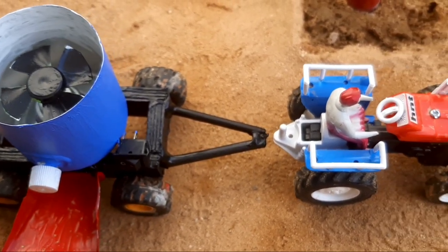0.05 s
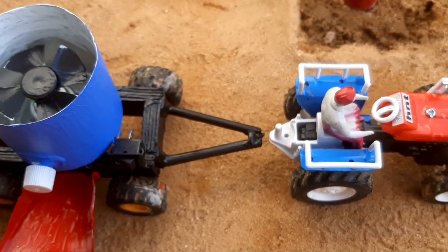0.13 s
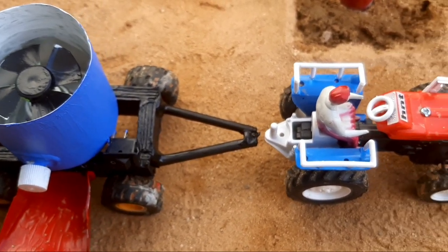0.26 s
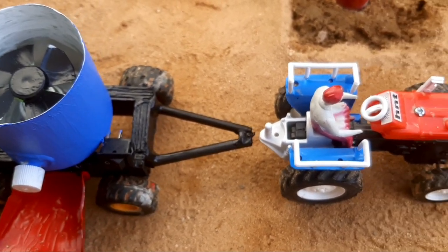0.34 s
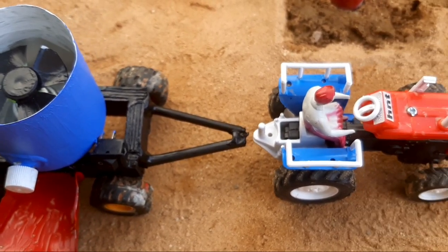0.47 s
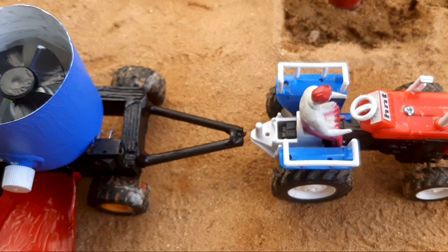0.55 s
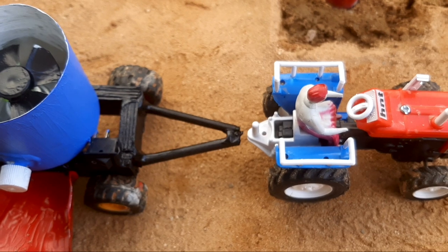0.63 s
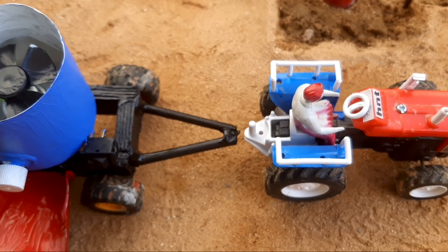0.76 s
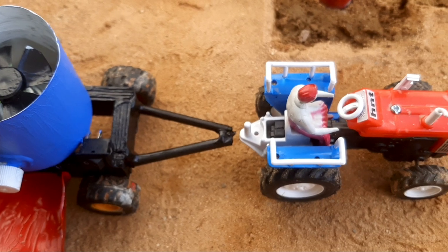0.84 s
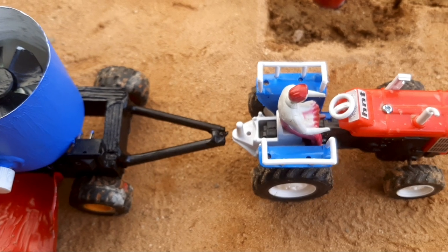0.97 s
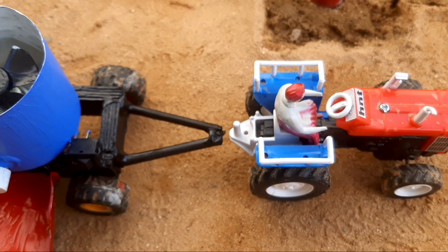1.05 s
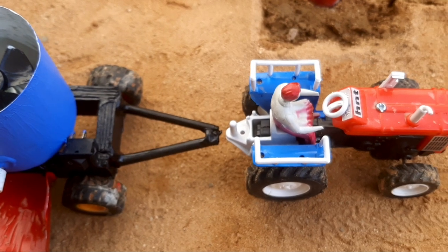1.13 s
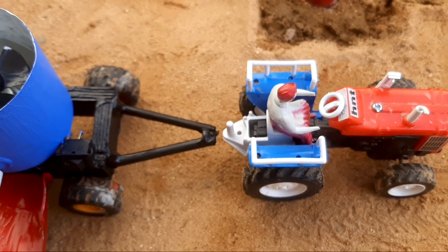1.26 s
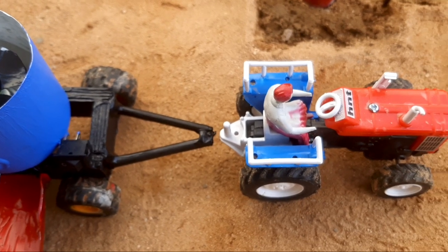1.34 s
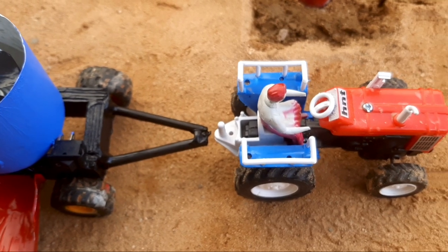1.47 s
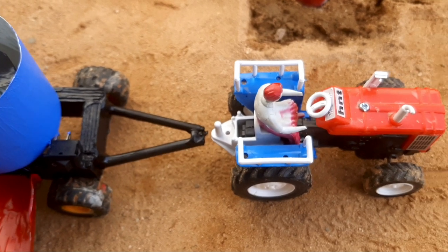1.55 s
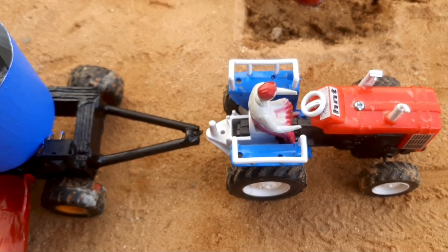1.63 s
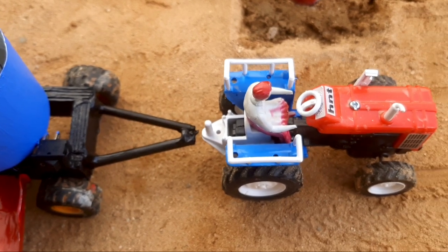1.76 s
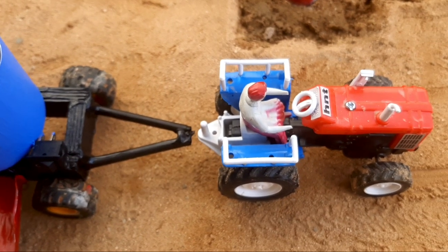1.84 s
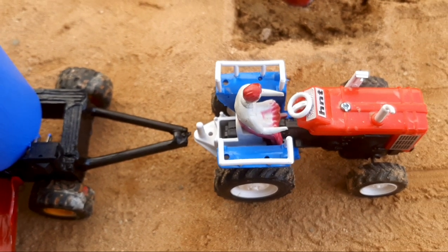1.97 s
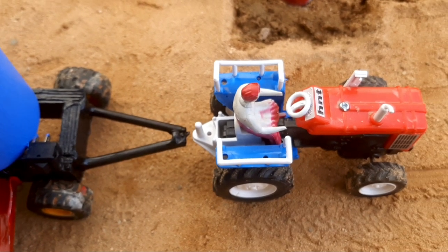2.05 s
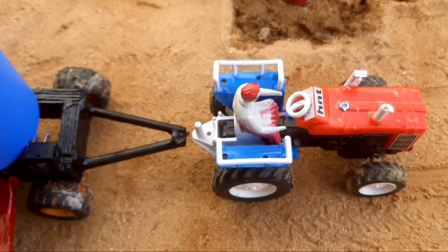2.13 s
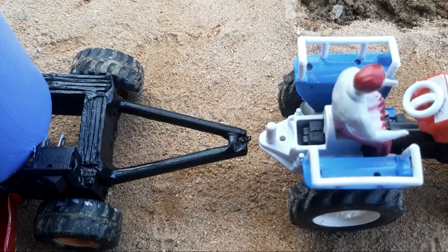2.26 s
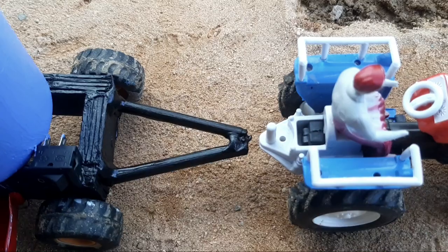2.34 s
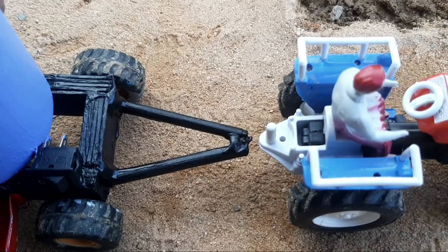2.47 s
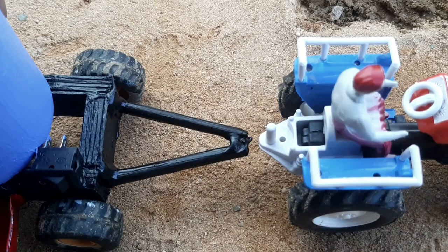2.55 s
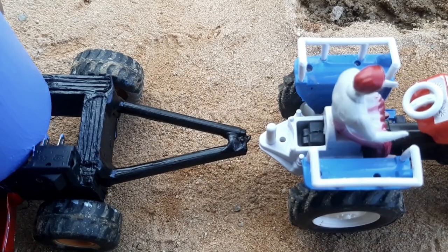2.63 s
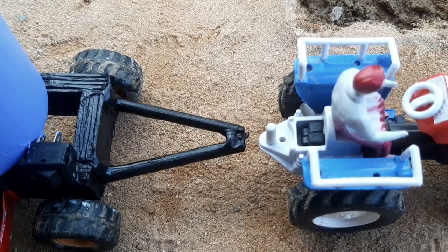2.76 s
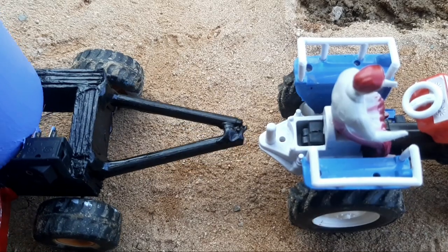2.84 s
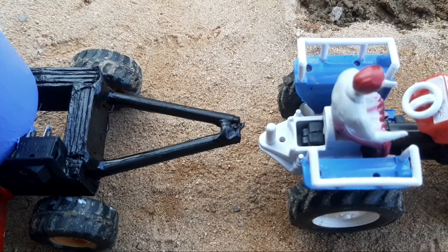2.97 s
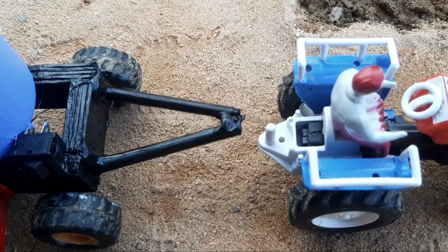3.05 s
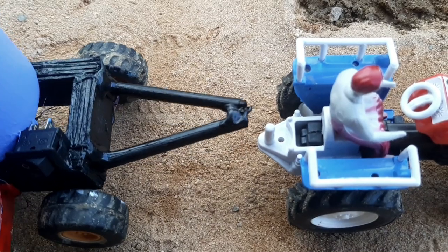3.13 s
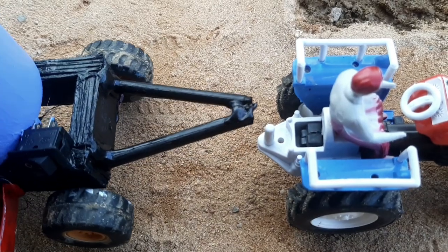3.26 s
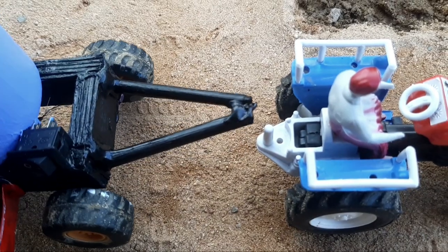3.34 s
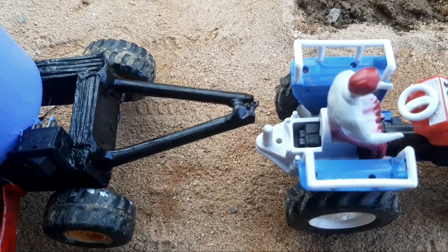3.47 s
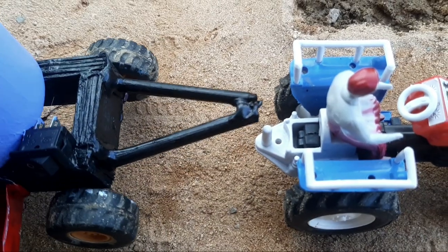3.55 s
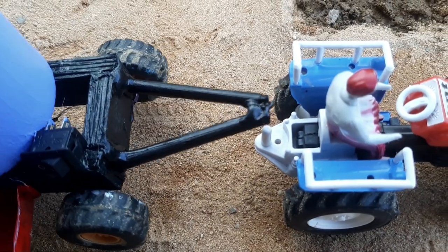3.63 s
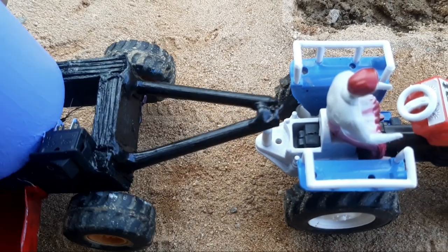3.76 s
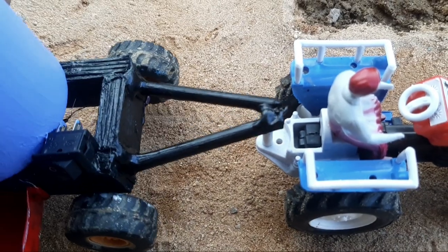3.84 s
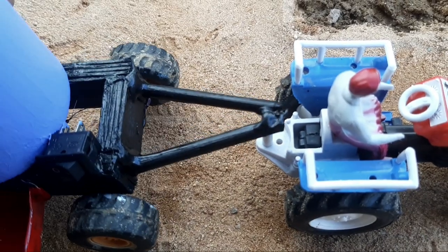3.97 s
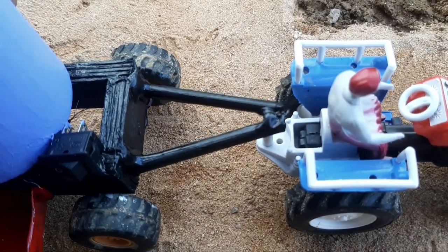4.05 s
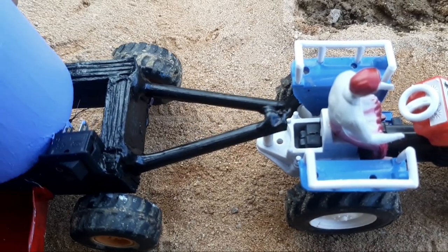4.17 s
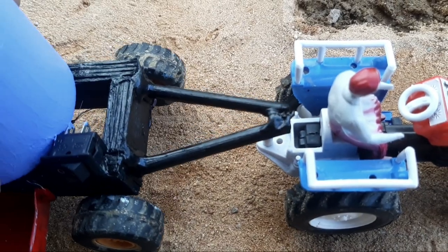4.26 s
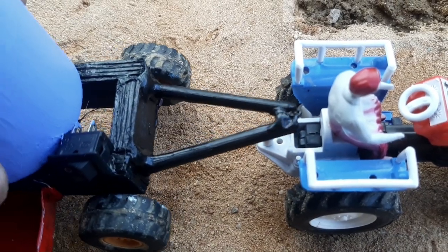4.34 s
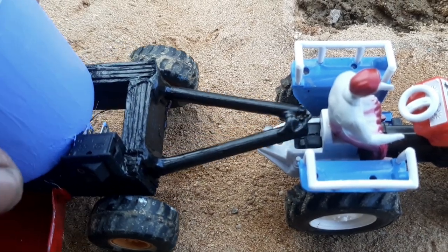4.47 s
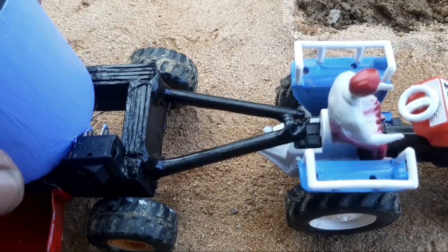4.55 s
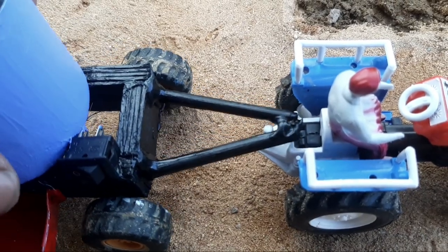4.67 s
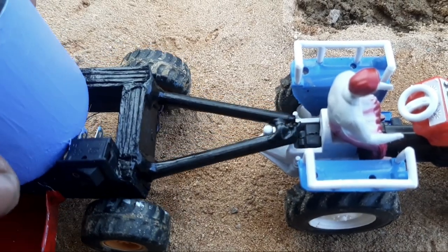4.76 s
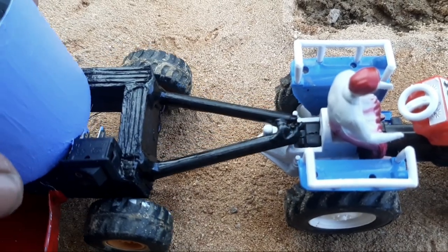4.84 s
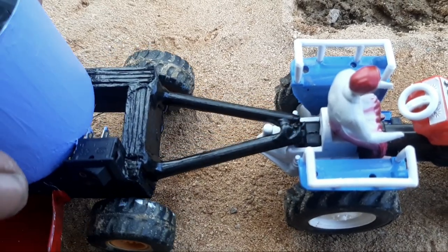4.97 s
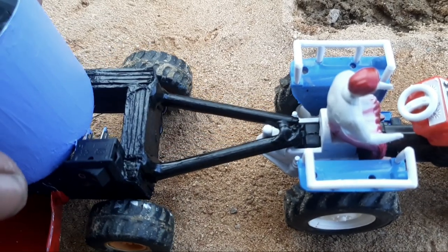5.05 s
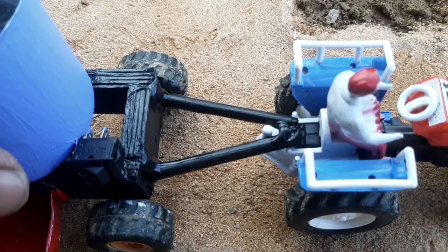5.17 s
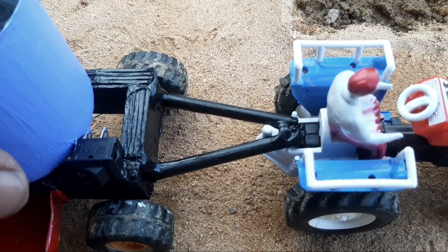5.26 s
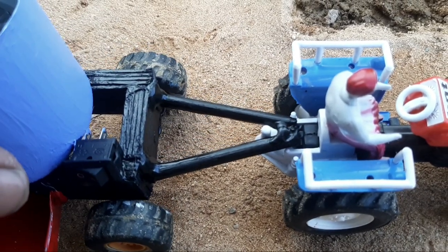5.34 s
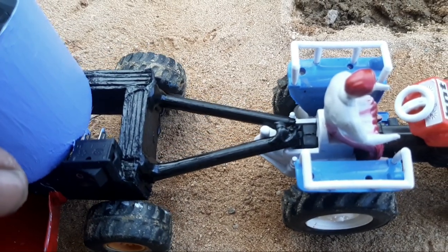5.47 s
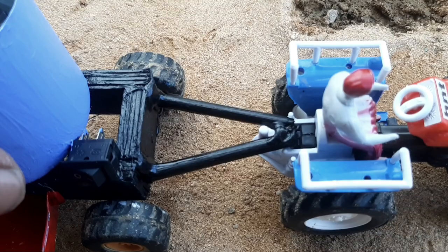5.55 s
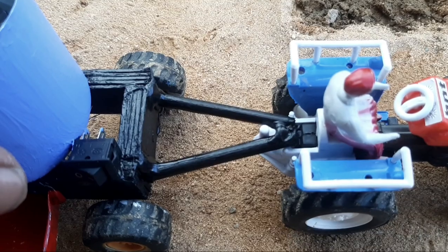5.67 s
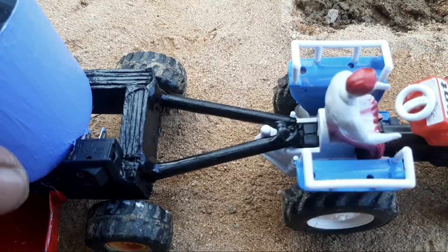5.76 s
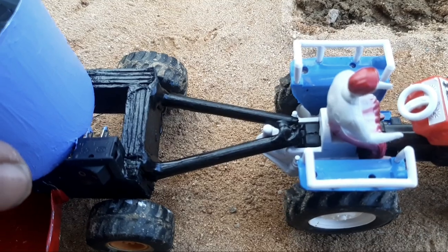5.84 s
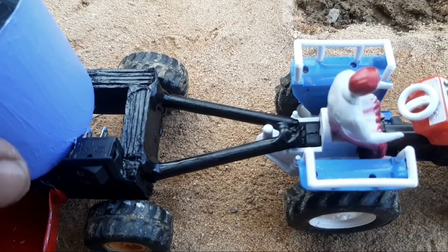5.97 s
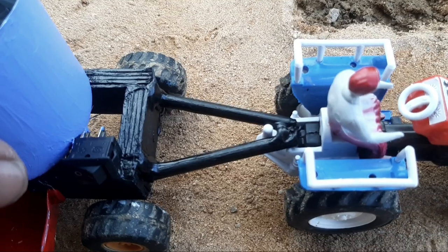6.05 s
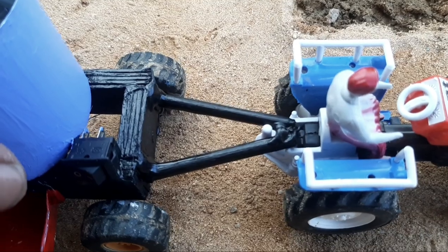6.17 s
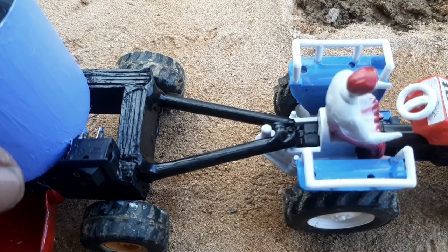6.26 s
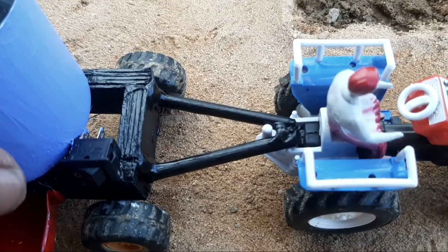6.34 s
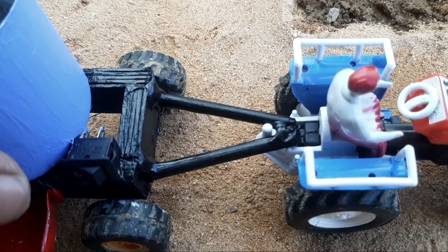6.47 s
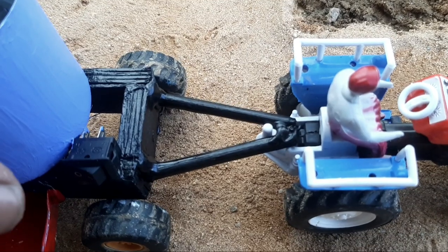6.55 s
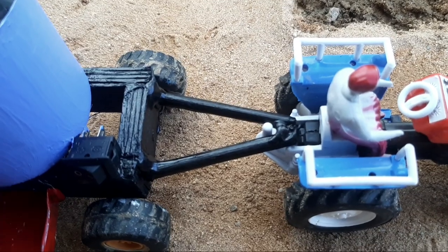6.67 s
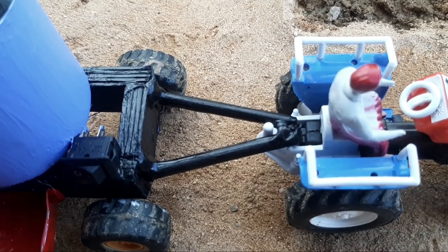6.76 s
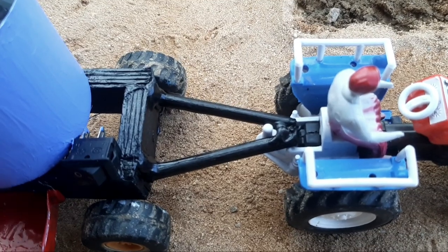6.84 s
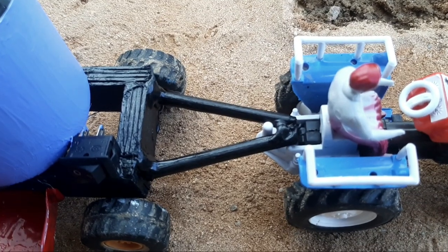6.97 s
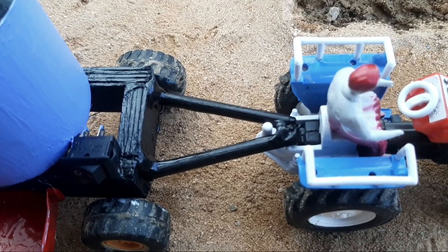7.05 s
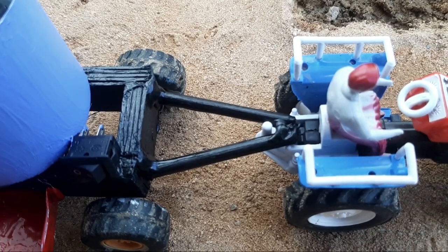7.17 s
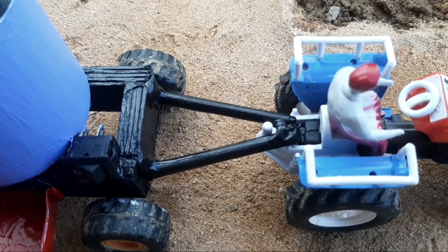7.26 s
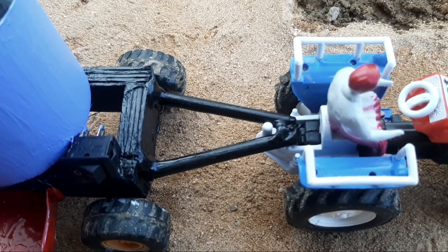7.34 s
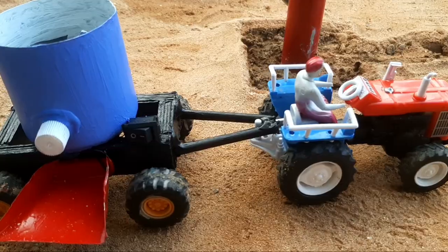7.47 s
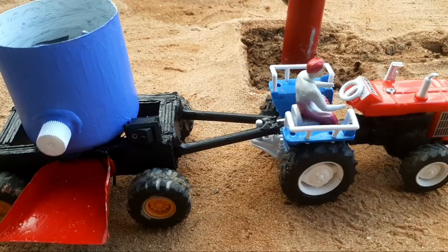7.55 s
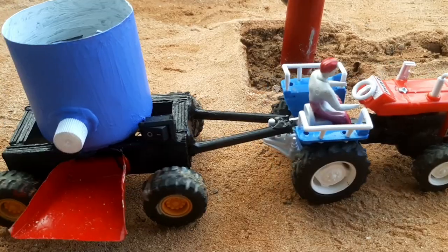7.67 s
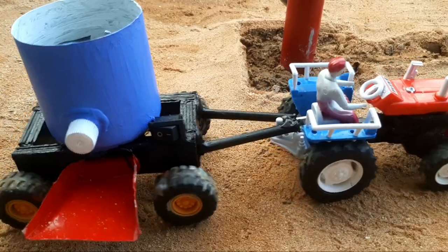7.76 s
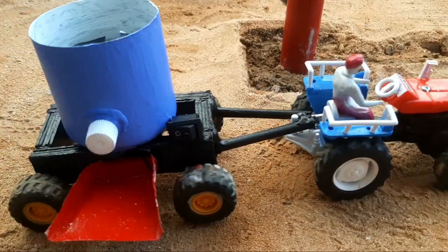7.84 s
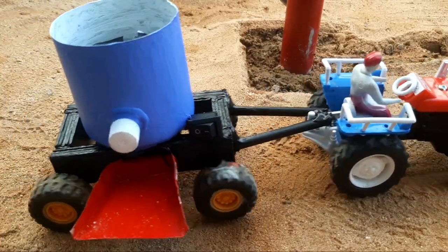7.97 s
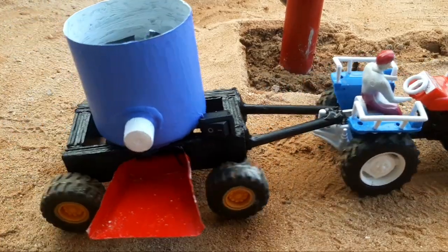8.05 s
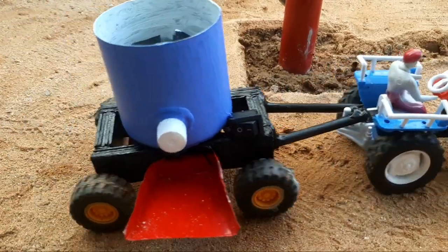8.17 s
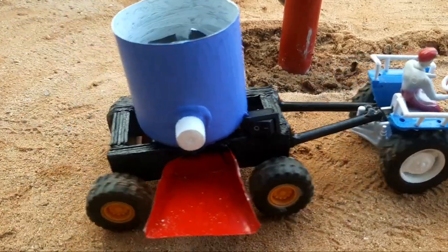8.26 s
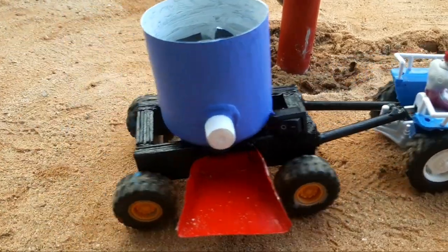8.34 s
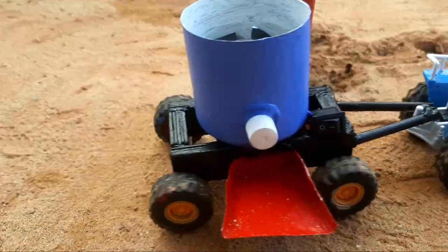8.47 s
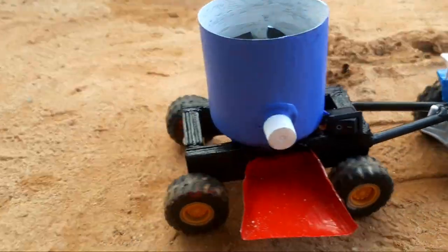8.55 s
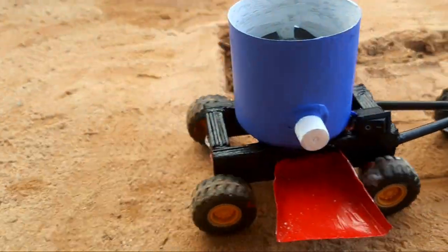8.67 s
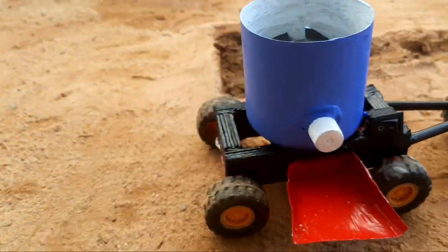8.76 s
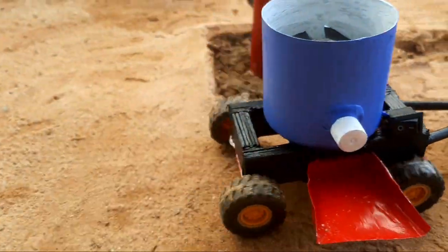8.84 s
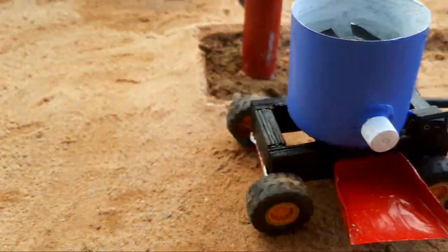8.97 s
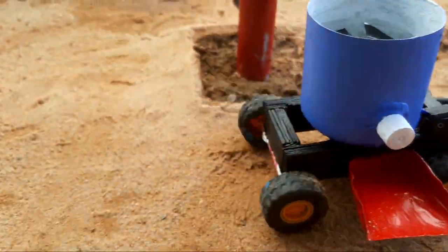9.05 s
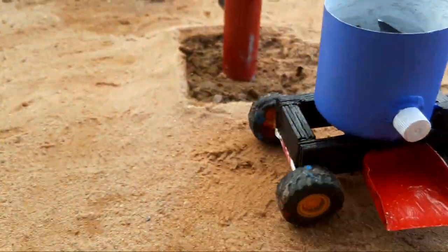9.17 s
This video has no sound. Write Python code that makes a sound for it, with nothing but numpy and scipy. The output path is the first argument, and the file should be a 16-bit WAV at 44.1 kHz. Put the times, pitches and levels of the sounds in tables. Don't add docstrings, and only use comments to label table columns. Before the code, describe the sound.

Low traffic rumble and short, bright sparrow chirps with wall echoes surround a toy heard very close and central. After several seconds comes one hard plastic crack with a dull thud into sand and a bounce, followed by a cluster of dry finger taps and faint rubbing. Clear small whistles follow, then a chattering toy motor swells, wheels knock and slip, and gritty tyres roll until the end.

```python
import sys
import numpy as np
from scipy import signal
from scipy.fft import rfft, irfft
from scipy.io import wavfile
from scipy.ndimage import uniform_filter1d

SR = 44100
rng = np.random.default_rng(int(sys.argv[2]) if len(sys.argv) > 2 else 0)


def elevation(decibels):
    levels = np.asarray(decibels, float)
    return 10 ** (levels / 20)


def transcribe(u):
    v = np.clip(np.atleast_2d(u).T, -1, 1)
    q = np.round(v * 32767).astype(np.int16)
    wavfile.write(sys.argv[1], SR, q)


N = 406161
TIME = np.arange(N) / SR

# (frequency [Hz], level [dB per Hz])
YARD_COLOUR = [(12, -50), (20, -5), (81, 2), (127, -6.5), (163, -5.5), (193, -9.5), (248, -9.5),
               (388, -13.5), (472, -18), (590, -16), (1480, -22.5), (3440, -32), (4940, -34.5),
               (14700, -59.5), (16000, -62)]
# (frequency [Hz], level [dB per Hz])
YARD_SIDE_COLOUR = [(12, -20), (20, -11.5), (93, 4), (123, -4.5), (216, -7), (485, -14.5), (1760, -20),
                    (14700, -39.5), (16000, -57)]
# (time [s], level [dB])
TRAFFIC_SWELL = [(0.0, -50.5), (0.46, -50.5), (0.56, -51), (2.11, -51), (3.07, -49), (3.22, -50),
                 (3.45, -51), (3.84, -49.5), (4.63, -50.5), (4.91, -49), (7.21, -52.5), (7.5, -51)]

# (time after call start [s], length [s], start [Hz], middle [Hz], end [Hz], roughness [0-1])
NEAR_SONG = [
    (-.05, .053, 5800, 6050, 6250, .4),
    (.002, .01, 4000, 4600, 5200, .22),
    (.01, .026, 5300, 5080, 4400, .22),
    (.082, .034, 3250, 3750, 3950, .15),
]
FAR_SONG = [
    (-.012, 0.018, 6000, 6270, 6900, 0.26),
    (0, 0.028, 4050, 4200, 3400, 0.2),
    (.064, .018, 3150, 3350, 3750, .25),
]
# (time [s], pitch factor, then the level of each note [dB])
NEAR_CALLS = [(.033, 0.96, -49.5, -46, -41.5, -50), (0.516, 0.99, -56, -42.5, -41, -55),
              (.973, 0.98, -51, -58, -35.5, -56), (1.688, 0.97, -62, -52, -48.5, -51),
              (2.376, 0.96, -50, -48, -38.5, -53)]
FAR_CALLS = [(1.044, 0.98, -53, -48.5, -45.5), (2.093, 0.98, -58, -47, -45.5),
             (3.141, 0.97, -58, -45, -44.5), (4.188, 0.96, -64, -47.5, -44),
             (5.075, 0.96, -61, -46.5, -45.5)]
# (time [s], length [s], middle [Hz], glide [share of pitch], level [dB])
WHISTLES = [(6.73, 0.03, 3080, -0.14, -54), (6.962, 0.04, 2980, -0.14, -54), (7.11, .065, 4100, -0.18, -55),
            (7.17, .035, 3350, -.02, -54), (7.24, .04, 2700, -0.17, -56), (7.275, .03, 2250, .03, -55),
            (7.375, .055, 2600, 0.13, -56), (7.36, .02, 2200, 0, -56), (2.45, .025, 5650, 0, -55),
            (7.52, .045, 3700, -.04, -59), (7.555, .04, 3150, -.14, -55), (6.69, .025, 3500, .06, -55),
            (7.605, .033, 2230, 0.036, -55), (7.36, .02, 3050, -.03, -58), (.497, .024, 3400, .06, -54),
            (6.885, .022, 2750, -.1, -59), (7.09, .04, 2900, .02, -58), (6.64, .014, 3400, .1, -51),
            (6.653, .016, 3000, -.08, -53), (6.59, .016, 3700, -.1, -53), (1.948, .012, 5600, .005, -58),
            (2.775, .015, 6500, .005, -61), (2.69, .025, 6500, .005, -66)]
ARCHED_NOTES = [(1.24, 0.04, 4500, -.04, -51), (1.28, .04, 4650, 0, -57), (1.312, 0.03, 3100, .02, -51),
                (1.385, .035, 3150, -0.028, -53), (1.25, .075, 6200, -0.026, -61.5),
                (1.915, 0.095, 3100, 0.005, -60.5), (2.61, .02, 5900, -0.018, -64),
                (4.35, .093, 6000, .015, -66), (4.38, .064, 3800, .02, -58), (6.635, .032, 3300, -.04, -55),
                (6.865, .04, 4300, -0.06, -59), (6.985, .025, 4250, 0.018, -54),
                (6.91, .045, 3450, 0.09, -57), (4.4, 0.048, 6100, -0.013, -65)]
DIPPED_NOTES = [(1.0, .073, 2800, -0.0027, -60), (.07, .03, 5900, -.01, -53),
                (1.66, .03, 6000, 0.038, -51.5), (2.44, 0.03, 5750, 0, -56), (3.045, .03, 6200, .01, -60),
                (3.06, .09, 4300, .03, -56), (4.45, 0.06, 3050, 0.002, -57), (6.14, 0.092, 4360, -.02, -57),
                (6.19, 0.122, 3140, -.04, -58), (6.572, 0.022, 3950, -.04, -52), (6.56, .06, 5600, 0, -61),
                (7.0, .06, 4750, -.03, -60), (6.9, .12, 3700, 0, -60), (6.66, .12, 3400, 0, -59),
                (7.3, .15, 3100, 0, -62), (7.5, .06, 4700, .05, -63), (1.26, .08, 5500, 0, -58),
                (4.53, .15, 973, -.015, -55)]
# (delay [s], level [dB])
NEAR_ECHOES = [(.016, -8), (.033, -8), (.048, -9), (.097, -13)]
FAR_ECHOES = [(.034, -10), (.075, -16)]
WHISTLE_ECHOES = [(.015, -2), (.1, -14)]

# (frequency [Hz], level [dB], time to fall 60 dB [s])
DRUM_MODES = [(740, -9.5, 0.072), (1500, -12.5, 0.065), (1872, -20, 0.22), (2400, -17, .05),
              (2660, -6.5, 0.088), (3720, -8, 0.086), (4452, -10, 0.053), (4620, -13, 0.048),
              (4944, -0.5, 0.061), (6100, -18, 0.076), (6230, -4.5, 0.029), (6970, -21, .06),
              (7300, -11, .02), (8150, -29, .03), (9160, -23.5, 0.06)]
HELD_MODES = [(2420, -19.5, 0.1), (2620, -14, 0.089), (3520, -6.5, 0.036), (3710, -5.5, 0.069),
              (4650, -12, 0.035), (4920, -1.5, 0.068), (6170, 0.5, 0.038), (7340, 1, 0.031),
              (8220, -1.5, 0.023), (9260, -5.5, 0.024), (10400, -11.5, 0.025), (11400, -16, 0.014),
              (12600, -8.5, 0.0088), (14800, -11, 0.013)]
RIM_MODES = [(2428, -19, 0.048), (3730, -13, 0.039), (4630, -2, 0.013), (4990, -6.5, 0.032),
             (6030, -13, .04), (6180, -5, 0.032), (7400, -2, 0.012), (8240, -2, 0.013), (9330, -9, 0.019),
             (10360, -3.5, 0.019), (11500, -12, .025), (12580, -14, .022), (14730, -16, .02)]
# (time [s], peak [dB], treble over 7 kHz [dB], body under 2.9 kHz [dB], crack [dB])
DRAWBAR_BLOWS = [
    (4.7685, -8.5, 8.5, -20, 2),
    (4.7728, -6.5, -6, 5.5, -25),
    (4.7755, -14, 0, -5, -20),
    (4.808, -38, 10, -10, -4),
    (4.873, -19.5, -2, 7.5, -13),
    (4.91, -43, 14, 0, -15),
]
FINGER_TAPS = [(5.6475, -44, 13, 0, 0), (5.716, -39, -4, 2, -16), (5.753, -25, 3.5, 8.5, -2),
               (5.7848, -40, 4, 0, -8), (5.7952, -36, 2, 0, -4), (5.8154, -27, 11, 0, -2),
               (5.8211, -25, 2, 0, -19), (5.8434, -16.5, 3.5, 1, -2.5), (5.859, -39, -6, 3, -2),
               (5.8625, -18, 5, 0, -4.5), (5.8995, -34, 0, 0, 1), (5.904, -26, 7, -2, 2.5),
               (5.9156, -27, 0, -2, -3), (5.925, -32, 2, -2, -6), (5.931, -32, 5, -8, -18),
               (5.946, -31, 9, -4, -6), (5.9543, -13, 2.5, -1, -13), (5.961, -36, 7, -5, -5),
               (5.9723, -15, -1.5, 0, -15), (6.0055, -46, -10, 0, 11), (6.0399, -29.5, -1, 7.5, -12),
               (6.057, -38, 2, 2, -15), (6.066, -36, -14, -6, -20), (6.08, -36, -6, 8, -19),
               (6.3659, -54, -3, 0, -22)]
NAIL_FLICK = [
    (6.3153, -34, 0, 0, -15),
    (6.3167, -16, 0, 0, -16),
]
# (start [s], length [s], level [dB])
FINGER_SLIDES = [(5.714, .03, -54), (5.755, .055, -55), (5.815, .075, -55), (5.95, .05, -54),
                 (5.9, .047, -45), (6.034, .061, -45), (6.12, .19, -60), (6.306, .011, -46)]
# (time [s], peak [dB], pitch [Hz], time to fall 60 dB [s], start pitch factor)
SAND_THUDS = [(4.79, -24.5, 95, 0.34, 2.8), (4.787, -27, 58, 0.25, 1.7),
              (4.8737, -17.5, 148.7, 0.022, 19.3), (4.879, -24, 67, 0.21, 1.2),
              (4.911, -32, 143, 0.067, 6.5)]
# (time [s], level [dB], time to fall 60 dB [s])
BAR_JOLTS = [
    (4.7687, -7.5, 0.14),
    (4.8732, -14.5, 0.085),
    (4.9086, -30.5, .04),
    (5.753, -34, .02),
    (5.7955, -37, .02),
    (5.8434, -32.5, .02),
    (5.859, -37, .02),
    (5.904, -34, .02),
    (6.0055, -43, .01),
]

# (time [s], gear level [dB])
MOTOR_EFFORT = [(7.58, -68), (7.72, -58.5), (7.84, -54), (8.04, -43.5), (8.15, -46), (8.42, -37.5),
                (8.6, -38), (9.0, -44), (9.21, -38)]
# (frequency [Hz], width [Hz], level [dB])
GEARBOX_MODES = [(543, 115, 4.5), (1535, 38, 4.5), (1980, 45, 4), (2260, 46, 6), (2818, 35, 12),
                 (3610, 49, 0), (4030, 27, 7.5), (4320, 36, -3), (4940, 52, 4.5), (5360, 27, -1),
                 (6000, 35, -2), (6500, 42, -16)]
# (frequency [Hz], level [dB per Hz])
GEAR_COLOUR = [(530, -5), (900, -6), (1530, 1.5), (1850, -4), (2840, -1.5), (3180, -2), (4110, 4),
               (7000, -27), (9100, -50), (15400, -120)]
CHASSIS_COLOUR = [(35, -43), (60, -8), (107, -7.5), (209, -7.5), (404, -11.5), (530, -6.5), (1000, -15),
                  (1300, -13.5), (2200, -120)]
HISS_COLOUR = [(3530, -29), (6000, -5.5), (6650, -2.5), (7250, -6.5), (8860, -3.5), (10400, -3.5),
               (11400, -9.5), (14900, -25), (16000, -31)]
# (time [s], turns [Hz])
SHAFT_SPEED = [(8.25, 22), (8.5, 38.6), (8.75, 33.1), (9.21, 26.9)]
# (time [s], peak [dB], length [cycles], overtones [dB])
WHEEL_SLIPS = [(7.881, -29, 2.5, 3), (7.961, -23.5, 2.9, -1), (8.003, -19.5, 2.3, 3), (8.034, -27, 0.84, 3),
               (8.053, -18, 2.45, 3), (8.19, -20, 2.8, 1), (8.239, -15, 2.5, -0.5), (8.271, -14.5, 3.1, -8),
               (8.3, -28, 3, -10), (8.344, -16, 3.2, -2.5), (8.381, -11.5, 2.3, -3),
               (8.407, -12, 2.1, -0.5), (8.43, -19, 0.95, 6), (8.443, -17, 2, 4.5), (8.457, -26, 1.1, 5)]
# (time [s], peak [dB])
SAND_CRUNCHES = [(7.8103, -57), (7.836, -44), (7.9101, -54), (7.928, -44.5), (7.936, -46), (7.978, -35.5),
                 (8.0188, -49), (8.033, -36), (8.041, -40), (8.071, -42), (8.1121, -50), (8.1376, -52),
                 (8.164, -39), (8.2059, -47), (8.219, -36), (8.227, -39), (8.253, -34.5), (8.2867, -50),
                 (8.3072, -49), (8.329, -37), (8.343, -43), (8.371, -39), (8.395, -35), (8.409, -41),
                 (8.4304, -37), (8.451, -35), (8.4884, -40), (8.5057, -37), (8.5426, -40), (8.5606, -36),
                 (8.616, -38), (8.6559, -42), (8.6733, -41), (8.7357, -39), (8.7786, -42), (8.7991, -37),
                 (8.8445, -46), (8.8519, -45), (8.8649, -41), (8.9113, -44), (8.9188, -42), (8.9333, -40),
                 (8.9826, -47), (8.9901, -41), (9.0051, -37), (9.055, -48), (9.0635, -44), (9.0779, -38),
                 (9.1288, -43), (9.1523, -38), (9.1972, -41),
                 (8.5224, -40), (8.5774, -43), (8.5964, -39), (8.6334, -44), (8.6894, -44), (8.7134, -43),
               (8.7564, -45), (8.8144, -42), (8.8844, -49), (8.9544, -48), (9.0994, -49), (9.1744, -45)]
# (time [s], length [s], middle [Hz], glide [share of pitch], level [dB])
AXLE_SQUEAK = (8.553, .034, 4930, -.01, -36)

STRAINS_S, ROLLS_S, CHANGE_S = 7.83, 8.5, 0.047


def unit(x):
    return x / np.sqrt(np.mean(x ** 2))


def coloured(x, points):
    hz, db = np.transpose(points)
    axis = np.log(np.arange(N // 2 + 1) * SR / N + 1)
    gain = elevation(np.interp(axis, np.log(hz), db, left=-90, right=-90))
    return unit(irfft(rfft(x) * gain, N))


def ring(x, hz, width):
    r = np.exp(-np.pi * width / SR)
    return signal.lfilter([1 - r, 0, r - 1], [1, -2 * r * np.cos(2 * np.pi * hz / SR), r * r], x)


def walk(rate):
    k = int(SR / rate)
    steps = np.repeat(rng.standard_normal(N // k + 1), k)
    return 0.71 * uniform_filter1d(uniform_filter1d(steps, k), k)[:N]


def grains(rate, spread_db):
    hit = (rng.random(N) < rate / SR) * rng.standard_normal(N)
    return unit(hit * elevation(spread_db * rng.exponential(size=N)))


def add(out, s, x):
    i = int(s * SR)
    x = x[max(-i, 0):N - i]
    out[max(i, 0):max(i, 0) + len(x)] += x


def yard():
    whole = coloured(rng.standard_normal(N), YARD_COLOUR)
    bass = signal.sosfiltfilt(signal.butter(2, 250, fs=SR, output="sos"), whole)
    swell = np.interp(TIME, *np.transpose(TRAFFIC_SWELL))
    swell = swell - swell.mean()
    bass_gain = elevation(0.35 * swell + 0.62 + 0.77 * walk(3.38))
    rest_gain = elevation(swell + 0.33 + 0.39 * walk(4.6))
    mid = bass * bass_gain + (whole - bass) * rest_gain
    side = coloured(rng.standard_normal(N), YARD_SIDE_COLOUR)
    lean = elevation(np.array([[1.4], [-1.4]]) / 2)
    return elevation(-44) * mid * lean + elevation(-56) * side * np.array([[1], [-1]])


def note(length, start_hz, mid_hz, end_hz, db, rough):
    u = np.arange(int(length * SR)) / (length * SR)
    hz = start_hz * (1 - u) * (1 - 2 * u) + 4 * mid_hz * u * (1 - u) + end_hz * u * (2 * u - 1)
    shake = uniform_filter1d(rng.standard_normal((2, 9000)), size=24)[:, :len(u)] * np.sqrt(24)
    phase = 2 * np.pi * np.cumsum(hz * (1 + 0.11 * rough * shake[0])) / SR
    tone = (np.sin(phase) + elevation(-25) * np.sin(2 * phase)) * (1 + rough * shake[1])
    envelope = np.minimum(6 * u, 1) * (1 - u ** 6)
    return elevation(db) * envelope * tone


def chirp(length, hz, glide, db, bow, rough):
    return note(length, hz * (1 + bow - glide), hz, hz * (1 + bow + glide), db, rough)


def space(dry, echoes, wet_db):
    t = TIME[:SR]
    noise = rng.standard_normal(SR) + 0.8 * rng.standard_normal((2, SR))
    tail = noise * 1000 ** (-t / 0.71) * (t > .004)
    tail *= elevation(wet_db) / np.sqrt(np.sum(tail[0] ** 2))
    tail[:, 0] = 1
    for s, db in echoes:
        tail[:, int(s * SR)] += elevation(db)
    return signal.oaconvolve(dry[None], tail, axes=1)[:, :N]


def birds():
    near, far, whistler = np.zeros((3, N))
    for dry, song, calls in ((near, NEAR_SONG, NEAR_CALLS), (far, FAR_SONG, FAR_CALLS)):
        for s, pitch, *levels in calls:
            for (after, length, *hz, rough), db in zip(song, levels):
                add(dry, s + after, note(length, *(pitch * np.array(hz)), db, rough))
    groups = ((near, ARCHED_NOTES, -0.0503, .65),
              (near, DIPPED_NOTES, 0.04, .8),
              (whistler, WHISTLES, 0.036, .2))
    for dry, table, bow, rough in groups:
        for s, *shape in table:
            add(dry, s, chirp(*shape, bow, rough))
    near_birds = space(near, NEAR_ECHOES, wet_db=0.5)
    far_bird = space(far, FAR_ECHOES, wet_db=-4)
    return near_birds + far_bird + space(whistler, WHISTLE_ECHOES, wet_db=0)


def blows(events, modes, mix_db, knock_db, knock_s):
    out = np.zeros(N)
    hz, db, t60 = np.transpose(modes)[:, :, None]
    t = TIME[:SR // 4]
    crack_band = signal.butter(2, [850, 7000], "bandpass", fs=SR, output="sos")
    knock_band = signal.butter(2, [400, 2600], "bandpass", fs=SR, output="sos")
    for s, peak_db, top_db, body_db, crack_db in events:
        chance = rng.standard_normal((3, len(hz), 1))
        gain = elevation(db + mix_db * chance[0] + top_db * (hz > 7000) + body_db * (hz < 2900))
        swing = np.sin(2 * np.pi * hz * ((1 + .0012 * chance[1]) * t + s))
        fade = 1000 ** (-t / t60 * elevation(mix_db / 2 * chance[2]))
        rings = np.sum(gain * swing * fade, axis=0) * (1 - np.exp(-t / 0.00042))
        crack_fade = np.exp(-t / 0.0014) + 0.26 * np.exp(-t / 0.01)
        crack = signal.sosfilt(crack_band, rng.standard_normal(len(t)) * crack_fade)
        knock = signal.sosfilt(knock_band, rng.standard_normal(len(t)) * np.exp(-t / knock_s))
        hit = rings / np.abs(rings).max() + elevation(crack_db) * crack + elevation(knock_db) * knock
        add(out, s, elevation(peak_db) * hit)
    return out


def drawbar_on_drum():
    return blows(DRAWBAR_BLOWS, DRUM_MODES, mix_db=0.5, knock_db=-13.0, knock_s=.003)


def bar_wave():
    out = np.zeros(N)
    t = TIME[:SR // 2]
    age = t + 1 / SR
    turns = 37 * age + 1.05 * np.log(1000 * age) - .27
    sweep = np.cos(2 * np.pi * turns) * np.minimum(age / 0.00049, 1)
    for s, db, t60 in BAR_JOLTS:
        add(out, s, elevation(db) * sweep * 1000 ** (-t / t60))
    return out


def sand_thuds():
    out = np.zeros(N)
    t = TIME[:SR // 2]
    for s, db, hz, t60, start in SAND_THUDS:
        glide = 1 + (start - 1) * np.exp(-t / 0.001)
        thud = np.sin(2 * np.pi * hz * np.cumsum(glide) / SR)
        add(out, s, elevation(db) * thud * 1000 ** (-t / t60))
    return out


def finger_taps():
    damped = np.array(HELD_MODES) * [1, 1, .75]
    taps = blows(FINGER_TAPS, damped, mix_db=4.0, knock_db=-21.0, knock_s=0.0023)
    return taps + blows(NAIL_FLICK, RIM_MODES, mix_db=1.0, knock_db=-30.0, knock_s=.002)


def finger_slide():
    rub = grains(rate=7000, spread_db=1.8) * elevation(3.5 * walk(110))
    wall = sum(elevation(db) * unit(ring(rub, hz, 4.5 / t60)) for hz, db, t60 in HELD_MODES)
    rubbed = unit(wall) + elevation(-5) * unit(ring(rub, 4000, 6000))
    level = np.zeros(N)
    for s, length, db in FINGER_SLIDES:
        edges = np.minimum(TIME - s, s + length - TIME) / 0.013
        level += elevation(db) * np.clip(edges, 0, 1)
    return rubbed * level


def stage(idle, strain, roll):
    times = [STRAINS_S - CHANGE_S / 2, STRAINS_S, ROLLS_S - CHANGE_S / 2, ROLLS_S + CHANGE_S / 2]
    return np.interp(TIME, times, [idle, strain, strain, roll])


def motor():
    s, db = np.transpose(MOTOR_EFFORT)
    effort_db = np.interp(TIME, s, db, left=-120, right=-120)
    teeth = grains(rate=4000, spread_db=0.0) * elevation(2.3 * walk(30))
    box = np.zeros(N)
    for hz, width, db in GEARBOX_MODES:
        flutter = elevation(db + 5 * walk(16))
        box += flutter * unit(ring(teeth, hz, 1.6 * width)) * np.sqrt(width)
    gears = elevation(-5) * unit(box) + elevation(-1.5) * coloured(teeth, GEAR_COLOUR)
    chassis_db = stage(idle=-20, strain=2.5, roll=-1) + 4.3 * walk(25)
    chassis = coloured(rng.standard_normal(N), CHASSIS_COLOUR) * elevation(chassis_db)
    brushes = coloured(teeth, HISS_COLOUR) * elevation(stage(idle=-12, strain=-16.5, roll=-13.5) - 4.0)
    shaft_hz = np.interp(TIME, *np.transpose(SHAFT_SPEED)) * (1 + 0.01 * walk(4.14))
    turn = 2 * np.pi * np.cumsum(shaft_hz) / SR
    wobble = np.sin(turn) + elevation(-2.5) * np.sin(2 * turn)
    shudder = unit(ring(ring(rng.standard_normal(N), 33, 22), 33, 22))
    rumble = (wobble + elevation(-18.0) * shudder) * elevation(stage(idle=-10, strain=-4, roll=-1.5))
    return elevation(effort_db) * (gears + chassis + brushes + rumble)


def sand_crunch():
    high = np.zeros(N)
    t = TIME[:SR // 30]
    for s, db in SAND_CRUNCHES:
        fade_s = .011 if s < ROLLS_S else 0.0057
        rise = np.minimum(t / (.35 * fade_s), 1)
        add(high, s, elevation(db - 4.0) * np.exp(-t / fade_s) * rise)
    low = high * elevation(stage(idle=-4.5, strain=-2, roll=1.5) + 7.0)
    sand = grains(rate=5000, spread_db=0.35)
    return high * coloured(sand, HISS_COLOUR) + low * coloured(sand, GEAR_COLOUR)


def wheel_slips():
    out = np.zeros(N)
    for s, db, cycles, over_db in WHEEL_SLIPS:
        hz = 121 + 90 * (s - WHEEL_SLIPS[0][0])
        turn = 2 * np.pi * hz * TIME[:int(cycles / hz * SR)]
        overtones = .5 * np.sin(2 * turn + 1.85) + 0.35 * np.sin(3 * turn + 1.5) + 0.18 * np.sin(5 * turn + 0.99)
        wave = np.sin(turn) + elevation(over_db) * overtones
        add(out, s, elevation(db - 8.5) * wave * np.sin(turn / cycles / 2))
    return out


def axle_squeak():
    out = np.zeros(N)
    s, *shape = AXLE_SQUEAK
    add(out, s, chirp(*shape, bow=-.005, rough=0.3))
    return out


def scene():
    surroundings = yard() + birds()
    drawbar = drawbar_on_drum() + bar_wave() + sand_thuds()
    finger = finger_taps() + finger_slide()
    tractor = motor() + sand_crunch() + wheel_slips() + axle_squeak()
    return surroundings + drawbar + finger + tractor


def roll_off(x):
    return signal.sosfilt(signal.butter(12, 16710, fs=SR, output="sos"), x)


def record(dry):
    hiss = elevation(-73.5) * np.diff(rng.standard_normal((2, N + 1)))
    rounded = 1.4 * np.tanh((dry + hiss) / 1.4)
    low_pass = signal.ellip(6, .2, 30, 15300, fs=SR, output="sos")
    mix = signal.sosfilt(low_pass, rounded)
    return roll_off(mix)


dry = scene()
out = record(dry)
transcribe(out)
```